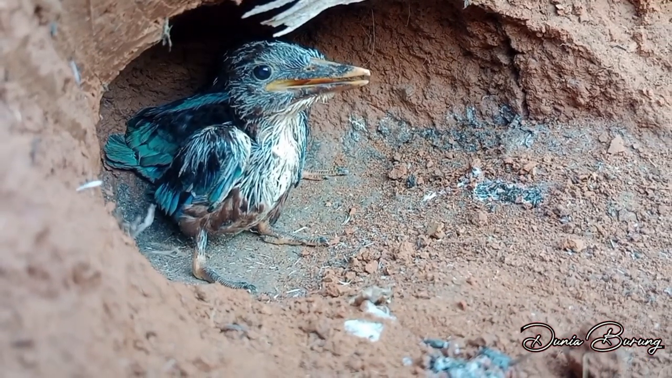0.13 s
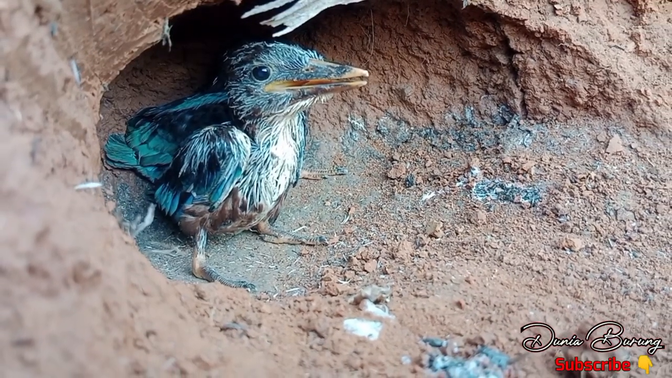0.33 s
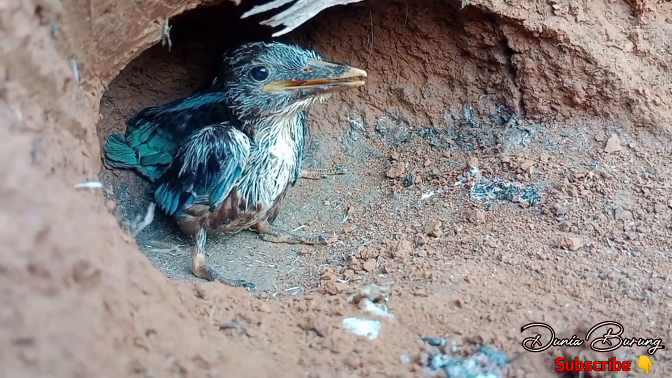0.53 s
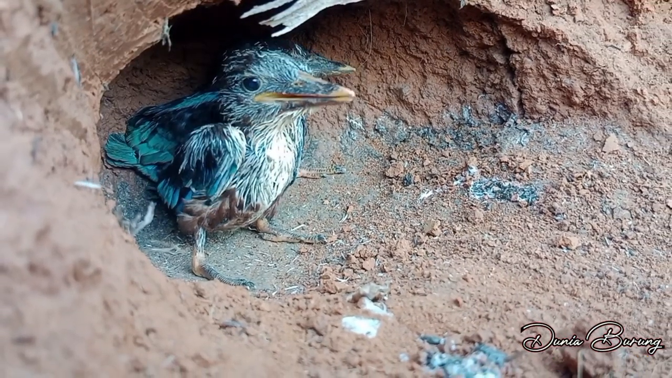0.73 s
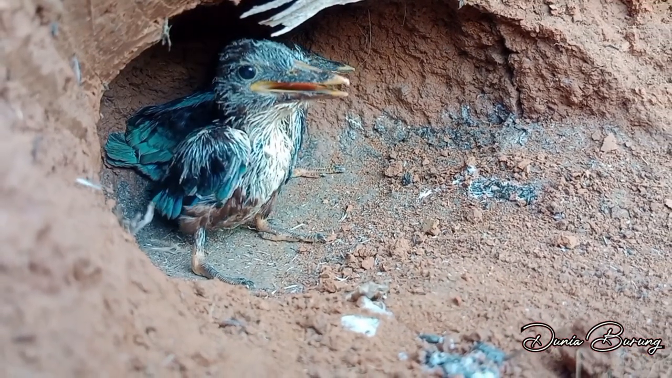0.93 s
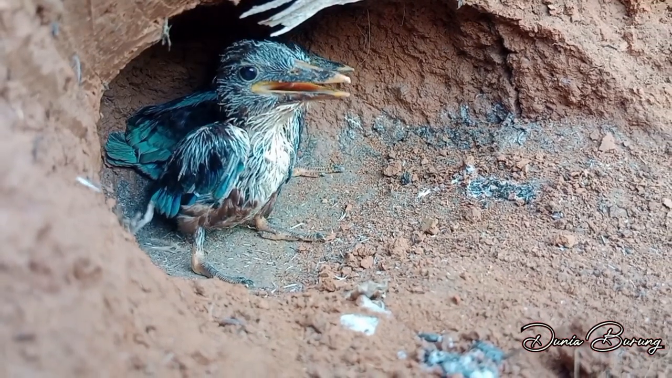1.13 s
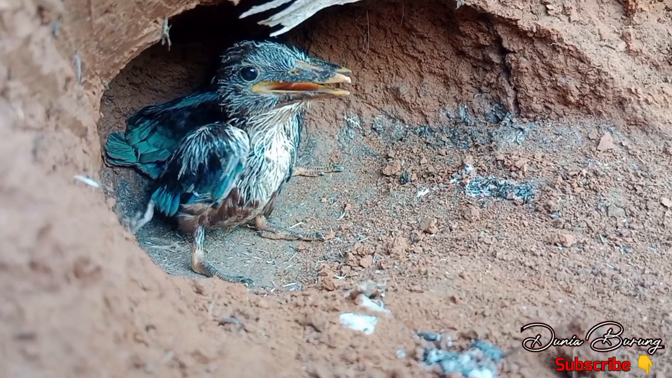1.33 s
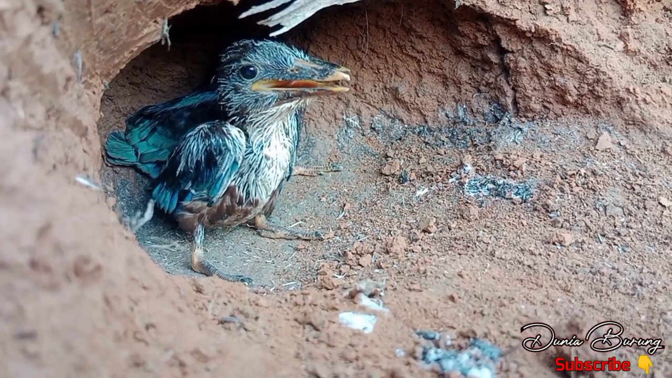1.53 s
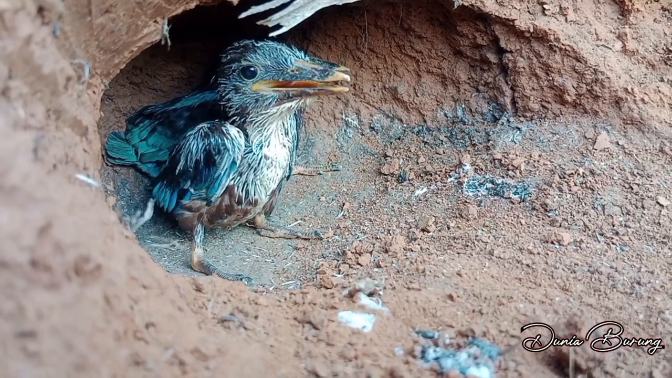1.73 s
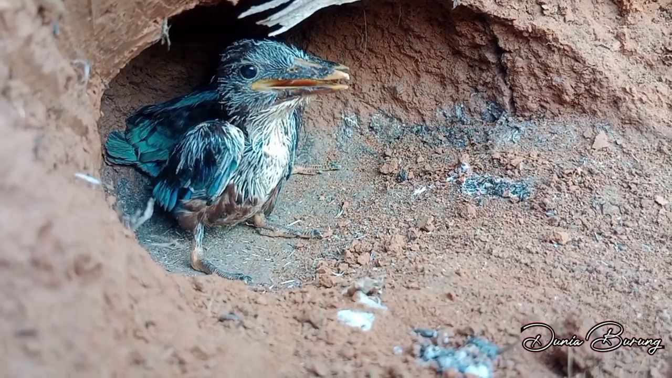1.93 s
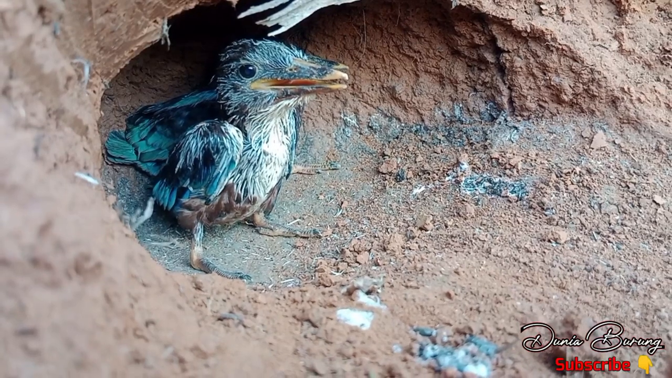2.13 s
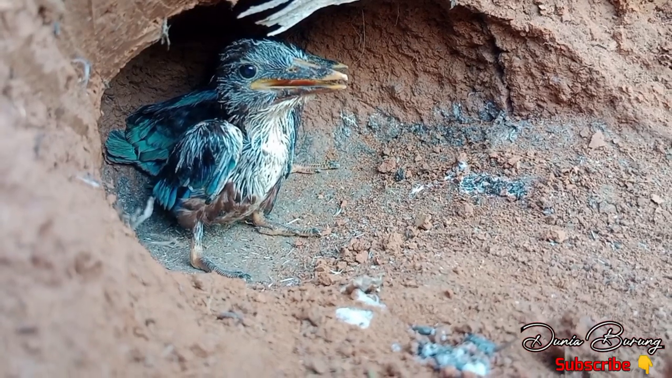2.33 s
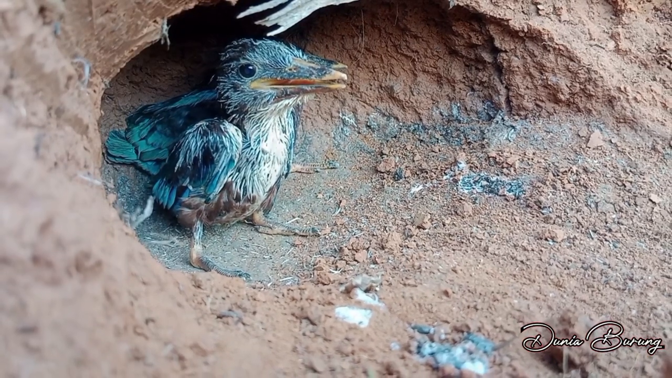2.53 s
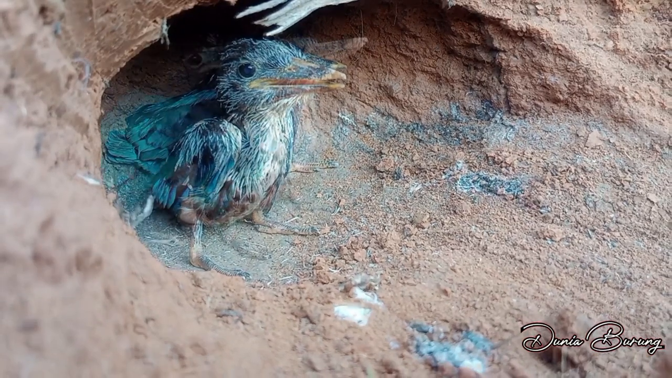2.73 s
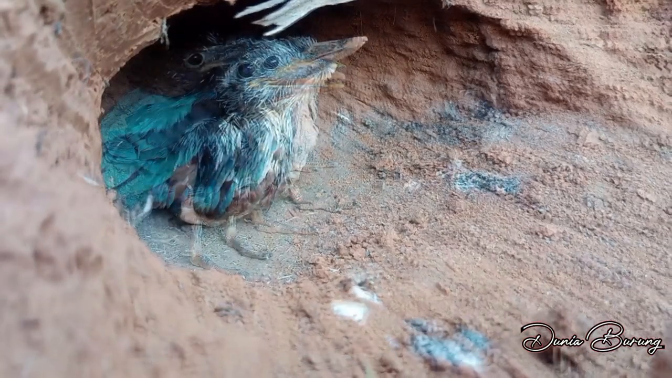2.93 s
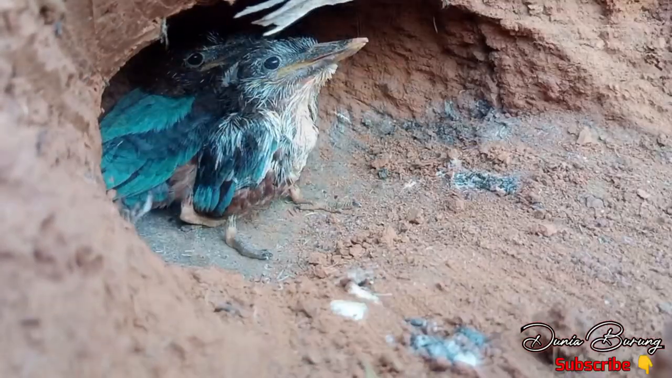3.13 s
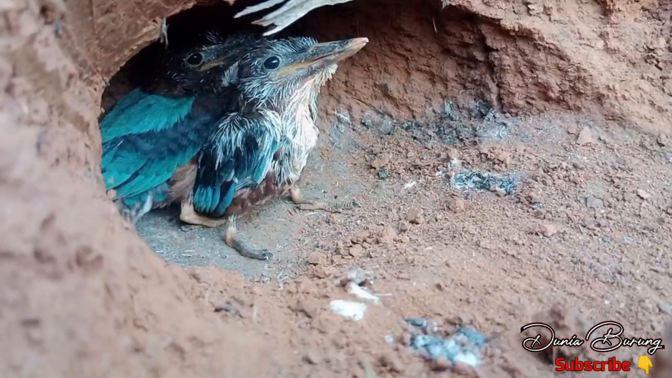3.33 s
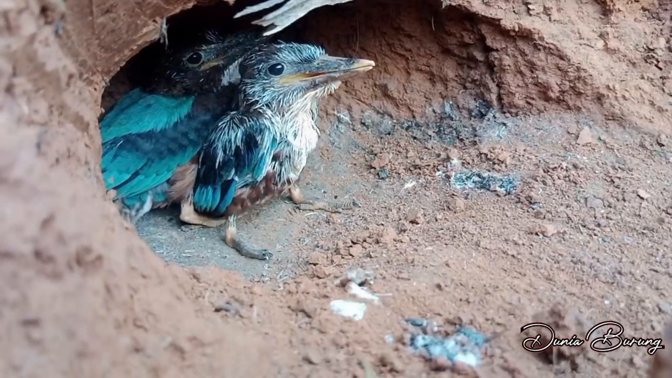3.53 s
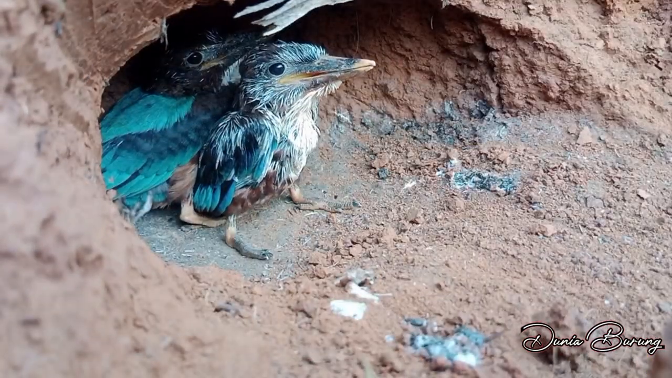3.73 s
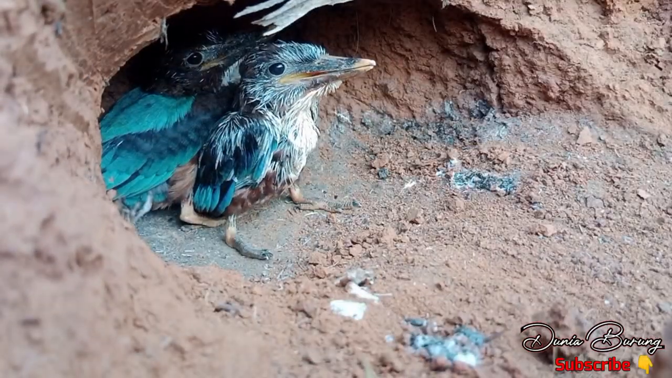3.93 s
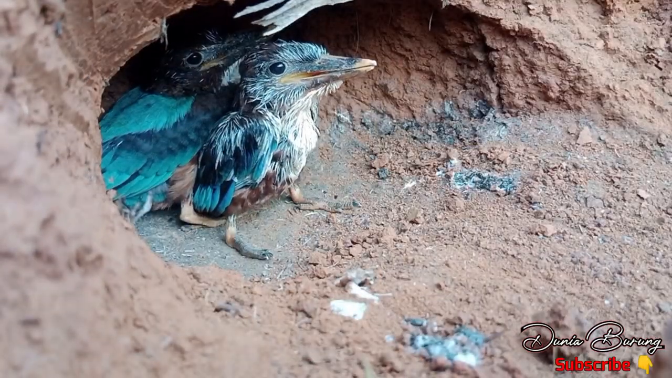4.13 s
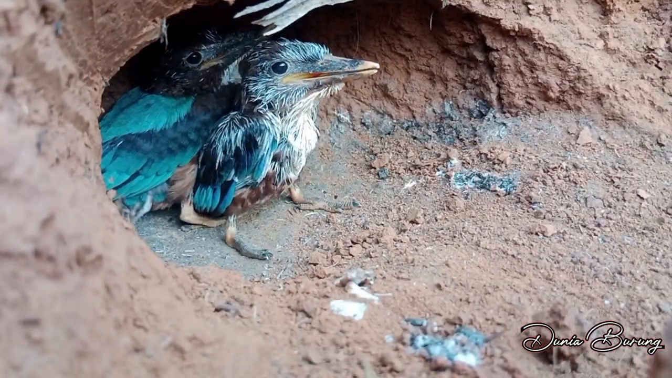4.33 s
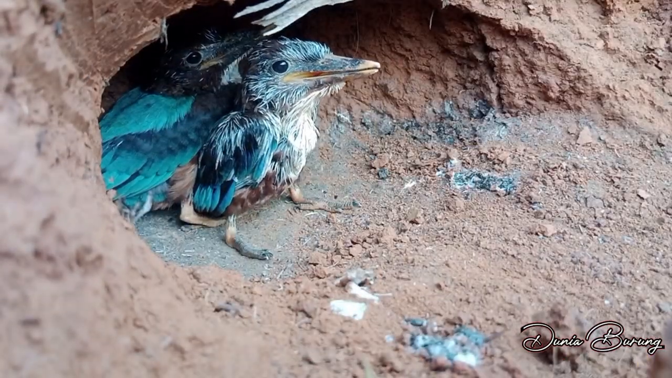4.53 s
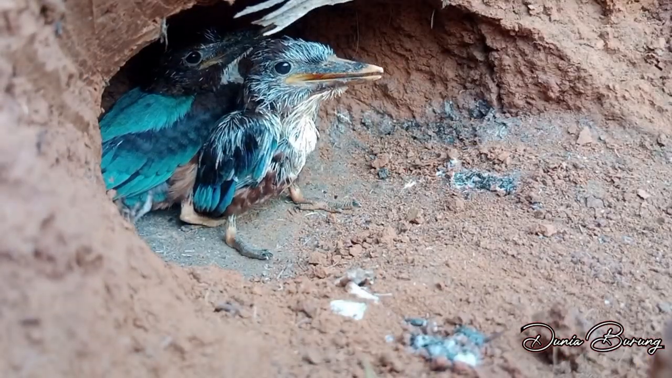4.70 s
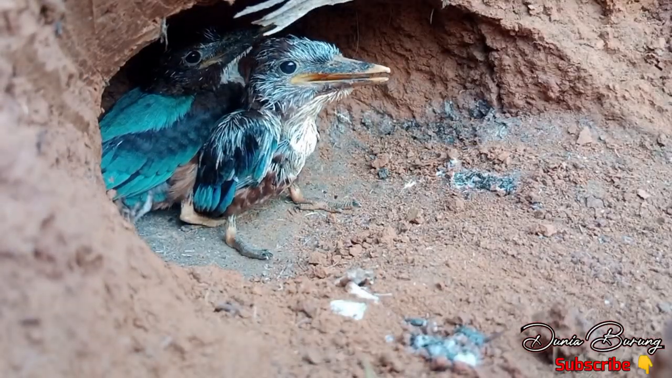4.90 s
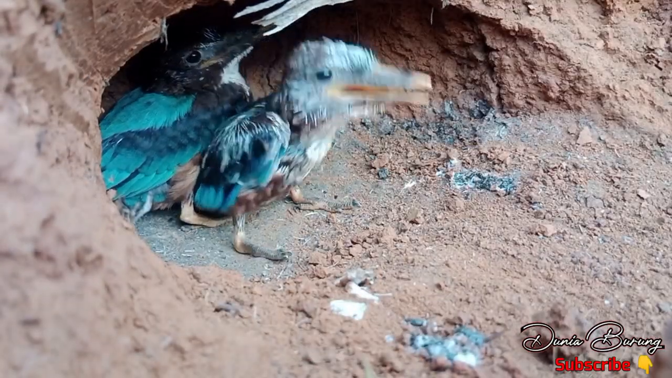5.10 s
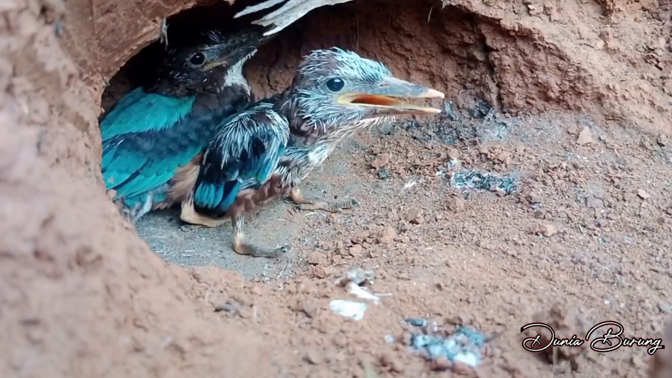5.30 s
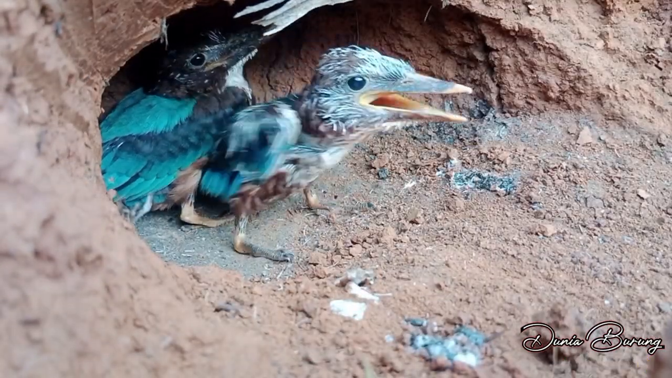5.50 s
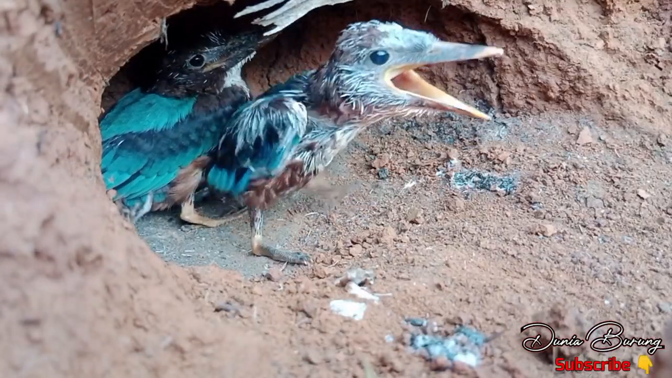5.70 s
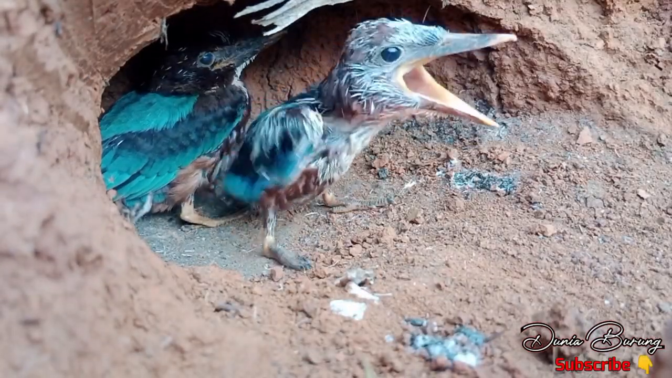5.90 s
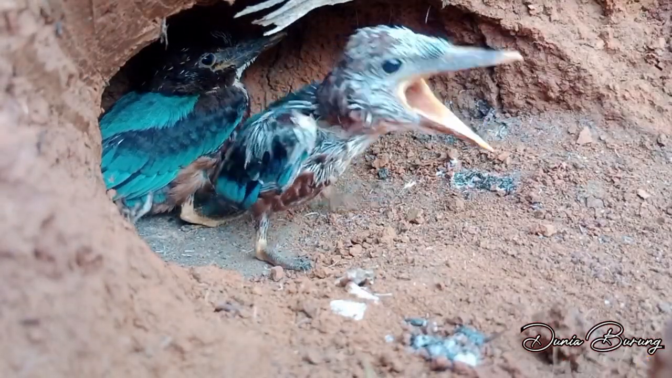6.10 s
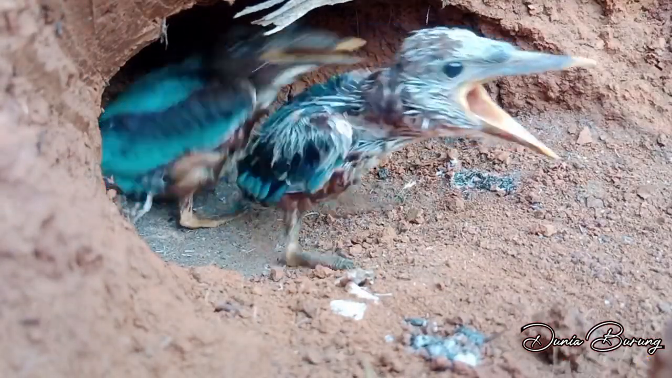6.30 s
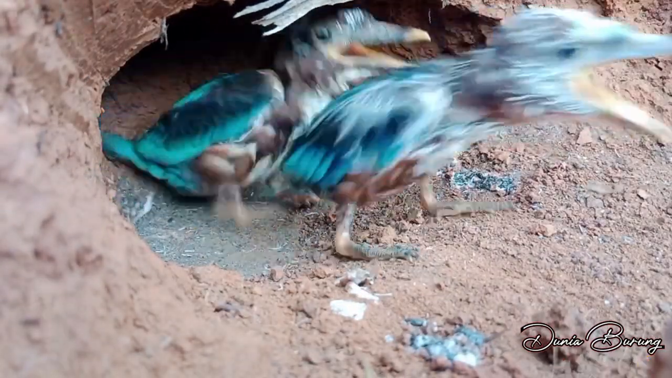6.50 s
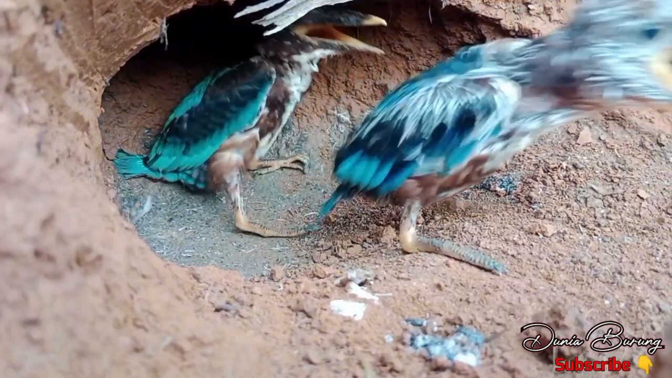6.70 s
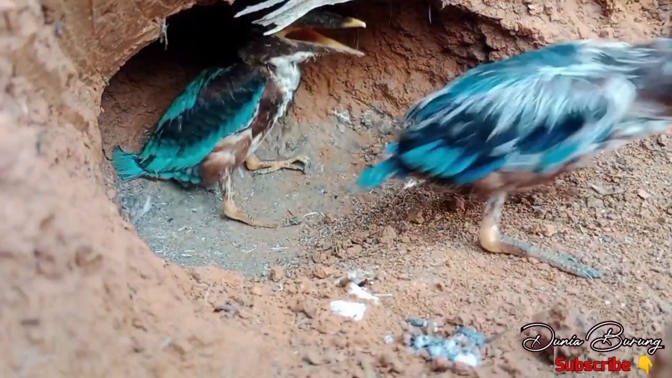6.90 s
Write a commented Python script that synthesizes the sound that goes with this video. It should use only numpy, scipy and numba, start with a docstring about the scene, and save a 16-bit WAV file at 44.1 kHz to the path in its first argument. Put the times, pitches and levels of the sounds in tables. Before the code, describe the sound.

A young bird begs at the mouth of an earth burrow, heard close and nearly dry against very quiet outdoor air. From 0.15 s, short rough buzzes of about 0.06 s repeat some ten times a second, each rising and falling in pitch, with small low croaks at the edges. Around 0.9-1.2 s they surge loudly with thin strained squeals, then settle into a steady quieter rattle, faintest near 3 s, with scattered tiny clicks and a barely audible low murmur early on. From 3.5 s the rasp gradually builds; by 4.9-5.6 s it is loud, bright and hissy, with a brief squeal. It eases slightly near 6 s, where two faint, soft, sinking bumps fall at 6.0 and 6.2 s. From 6.5 s to the cut at about 7 s, notes crowd to over twenty a second, joined by muffled rasps, perhaps a second chick, and squeals.

```python
"""Begging kingfisher nestlings

At the mouth of an earth burrow, close by, rasping notes come about ten a second, then crowd and brighten.
Each note is a rough buzz plus air noise; its pitch and throat resonance rise and fall with one push of air.
Low croaks and squeals go with the notes; muffled rasps, perhaps a second chick, join the last outburst.
Two soft sinking bumps sound as the first chick steps forward. Scattered thin clicks, made of brief noise,
and a faint low murmur of filtered noise are heard too, over quiet outdoor air.
"""
import sys
import numpy as np
from scipy import signal
from scipy.fft import rfft, irfft
from scipy.io import wavfile
from scipy.ndimage import uniform_filter1d
from numba import njit

SR = 44100
rng = np.random.default_rng(int(sys.argv[2]) if len(sys.argv) > 2 else 0)


def pcm_store(signal):
    """Save signal as 16-bit PCM."""
    levels = np.round(np.clip(np.atleast_2d(signal), -1, 1) * 32767)
    wavfile.write(sys.argv[1], SR, levels.astype(np.int16).T)


N = 306495
T = np.arange(N) / SR

# begging notes: (start [s], length [s], level [dB])
NOTES = [(0.151, 0.07, -35.5), (0.275, 0.059, -36.0), (0.394, 0.05, -35.5), (0.515, 0.053, -37.5),
         (0.648, 0.054, -33.5), (0.753, 0.074, -33.5), (0.841, 0.061, -30.5), (0.902, 0.062, -25.5),
         (0.958, 0.059, -22), (1.007, 0.082, -21.5), (1.132, 0.068, -32.0), (1.192, 0.064, -27),
         (1.303, 0.052, -32), (1.398, 0.062, -34.0), (1.495, 0.059, -32.5), (1.59, 0.059, -34),
         (1.693, 0.064, -33.4), (1.802, 0.06, -33.0), (1.915, 0.061, -35), (2.036, 0.044, -32.5),
         (2.148, 0.05, -35), (2.254, 0.059, -35.5), (2.377, 0.058, -35), (2.514, 0.048, -36),
         (2.617, 0.045, -35.5), (2.716, 0.061, -35.0), (2.812, 0.053, -37), (2.909, 0.063, -39),
         (3.006, 0.067, -40.5), (3.116, 0.045, -39.5), (3.188, 0.064, -43), (3.316, 0.066, -40.5),
         (3.428, 0.06, -37.5), (3.519, 0.061, -37), (3.632, 0.059, -36.5), (3.738, 0.056, -34.5),
         (3.847, 0.055, -37.5), (3.956, 0.043, -34), (4.058, 0.041, -32.5), (4.156, 0.051, -33),
         (4.244, 0.05, -33.5), (4.331, 0.046, -32.5), (4.431, 0.058, -34), (4.53, 0.046, -32),
         (4.623, 0.052, -31.0), (4.714, 0.058, -29.5), (4.808, 0.057, -30), (4.895, 0.061, -26),
         (4.962, 0.061, -25), (5.029, 0.067, -25), (5.131, 0.058, -27), (5.187, 0.078, -25),
         (5.277, 0.049, -24.5), (5.372, 0.057, -27.5), (5.458, 0.059, -22.5), (5.511, 0.07, -22),
         (5.572, 0.062, -23), (5.674, 0.06, -27.5), (5.75, 0.057, -25.5), (5.809, 0.062, -27.5),
         (5.907, 0.062, -29.5), (5.971, 0.057, -29), (6.023, 0.07, -26.5), (6.127, 0.064, -31.5),
         (6.196, 0.064, -28.5), (6.264, 0.06, -28.5), (6.351, 0.048, -29), (6.397, 0.033, -39.5),
         (6.431, 0.069, -26.5), (6.495, 0.038, -26), (6.53, 0.048, -21), (6.576, 0.044, -22.5),
         (6.617, 0.042, -21.5), (6.66, 0.043, -22.5), (6.7, 0.049, -21.5), (6.751, 0.049, -23),
         (6.796, 0.043, -22.5), (6.842, 0.052, -21.5), (6.898, 0.051, -22.5)]
# posture of the chick, 0 beak shut, 1 head raised, 2 wide gape, 3 neck thrust out: (time [s], posture [0-3])
POSTURE = [(0, 0), (2.6, 0), (3.1, 1.49), (3.5, 1), (4.85, 1), (5.05, 1.16), (5.6, 1.45), (5.69, 1.9),
           (6.1, 2), (6.3, 2.5), (6.52, 3), (6.95, 3)]
# how far a note falls off toward its edges: one value [dB] for each posture, 0 to 3
EDGE_FALL = [12.6, 13.9, 17.1, 10.15]
# colour of the voice in each posture: (frequency [Hz], level [dB])
VOICE_SHUT = [(290, -34.5), (450, -11), (690, -6.5), (880, -32.5), (1080, -33.5), (1550, 5), (2150, -1.5),
              (2350, -13), (2600, 3.5), (3250, -2.5), (3560, -10), (3850, -8.5), (4200, -22.5),
              (4550, -59.5)]
VOICE_RAISED = [(280, -47), (450, -7.5), (850, -8), (1170, -20.5), (1600, -2.5), (2220, -4.5),
                (2380, -13.5), (2530, -3), (2900, -8.5), (3150, -6), (3400, -15.5), (3800, -18.5),
                (4200, -30), (4500, -56)]
VOICE_GAPE = [(290, -52.5), (430, -5), (650, -3.5), (1150, -5.5), (1600, 6), (2150, -1.5), (2350, -8),
              (2550, 4), (2950, -13), (3300, 0.5), (3650, -2), (3900, 3.5), (4300, -11.5), (4750, -31.5)]
VOICE_THRUST = [(280, -54), (450, -15), (700, -6), (1100, -14), (1550, -5), (1900, 2), (2200, -5.5),
                (2500, -0.5), (2850, -11.5), (3150, 4), (3500, -10.5), (3900, -13), (4300, -28.5),
                (4800, -32)]
# upper resonances of the open and of the nearly shut beak: (frequency [Hz], level [dB])
HISS_OPEN = [(5000, -23.5), (5550, -13), (6000, -14.5), (6550, 2.5), (7100, -2), (7800, -15), (8500, -18),
             (9300, -29.5), (10500, -65.5)]
HISS_SHUT = [(4900, -38), (5600, -12), (6100, -14.5), (6500, 1), (7200, 1.5), (7900, -11), (8400, -34.5),
             (9200, -50)]
# hiss against the voice, before a fixed lift inside hiss(): (time [s], level [dB])
HISS_LEVEL = [(.2, -44.5), (.68, -54), (.8, -27), (1.2, -25.5), (1.7, -37), (1.9, -48.5), (2.45, -61.5),
              (2.9, -41), (3.3, -42.5), (3.5, -30.5), (4.65, -31.5), (5.05, -22.5), (5.45, -18),
              (5.75, -13), (6.2, -17), (6.45, -22.5), (6.6, -12.5), (6.95, -21)]
# colour of the thin whisper of air past the bill tip: (frequency [Hz], level [dB])
WHISPER = [(8900, -13), (9700, -1), (10300, -4), (11300, -14), (12400, -19), (13300, -18.5), (15000, -26)]
# whisper against the note, at the height of a note: (time [s], level [dB])
WHISPER_LEVEL = [(0, -71.5), (1.7, -65), (2.2, -52.5), (2.85, -48.5), (3.5, -53), (4.1, -42), (5.2, -44.5),
                 (5.5, -51), (6.3, -38), (6.95, -36.5)]
# a faint low murmur around 135 Hz, level at the top of each swell: (time [s], level [dB])
MURMUR = [(0, -63), (1, -64), (2.8, -65.5), (3.4, -82.5), (6.95, -84.5)]
# a few croaks that break out loudly: (middle [s], level [dB])
LOUD_CROAKS = [(0.211, -36.5), (1.971, -43), (2.433, -49.5)]
# thin clicks, level before noise and dulling: (time [s], level [dB])
CLICKS = [(0.217, -39), (.436, -37), (.698, -42), (1.26, -34), (1.857, -31.5), (2.077, -33), (4.095, -43),
          (4.573, -35), (4.674, -40), (5.093, -36), (6.31, -38), (6.459, -37)]
# strained squeals: (middle [s], length [s], top pitch [Hz], level [dB])
SQUEALS = [(.983, 0.02, 2600, -29), (.985, 0.038, 3090, -39), (1.034, 0.051, 3120, -28),
           (1.046, 0.054, 2570, -23.5), (1.211, 0.033, 2515, -23), (5.544, 0.029, 2538, -34),
           (6.722, 0.051, 2500, -23), (6.93, 0.061, 2460, -28)]
# muffled extra rasps, perhaps a second chick deeper in: (middle [s], length [s], level [dB])
SIBLING = [(3.083, 0.055, -44), (3.262, 0.054, -43.5), (3.386, .04, -46.5), (3.83, .084, -61),
           (5.657, .03, -65), (6.61, 0.24, -30.5), (6.836, .32, -35)]
# bumps on the soil: (middle [s], length [s], pitch at the middle [Hz], level of the tone [dB])
BUMPS = [(6.035, 0.17, 70.5, -49.5), (6.161, 0.0817, 127, -41.5)]
# colour of the quiet outdoor air: (frequency [Hz], level [dB])
AIR = [(25, -13.5), (60, -9), (120, -7), (400, -10.5), (1500, -24.5), (6000, -33.5), (15000, -35.5)]

AIR_DB = -86
TOP_HZ = 15600  # nothing much is heard above this
# effort is the amplitude of a note against a full-strength one at this level
FULL_DB = -21
# throat resonance at no effort and its rise at full effort, both before the crest factor in phrasing()
THROAT_REST_HZ, THROAT_EFFORT_HZ = 1981, 496
THROAT_SCATTER = 0.025  # random spread from note to note, as a share
# place of the crest within a note at no effort, and how much earlier it comes at full effort
CREST_SHARE, CREST_EARLIER = 0.58, 0.166
# share of the edge fall that is lost at full effort, so strained notes run together
MERGE_SHARE = 0.66
# the voice catches twice: after the opening pip and at a later, scattered share of the note
PIP_S, LATE_SHARE, LATE_SCATTER = 0.015, 0.758, 0.21
CATCH_S, CATCH_DB = 0.0047, 7.5  # depth at no effort with the beak shut
# croak level is against its note with the beak shut; the inset is its distance from the note's edge
CROAK_HZ, CROAK_S, CROAK_INSET_S, CROAK_DB, CROAK_SCATTER_DB = 710, 0.014, 0.0074, -23, 5


def undb(db):
    """Turn decibels into a gain."""
    return np.exp(np.asarray(db) * (np.log(10) / 20))


def curve(rows):
    """Join rows of (time, value) by straight lines, one value per sample."""
    return np.interp(T, *np.transpose(rows))


def steady(x, span_s):
    """Bring the running strength (rms) to 1 and keep the faster grain."""
    power = uniform_filter1d(x * x, max(int(span_s * SR), 8))
    return x / np.sqrt(np.abs(power) + 1e-12)


def wobble(span_s):
    """Smooth random wandering with a spread of about 1."""
    size = max(int(span_s * SR), 2)
    smooth = uniform_filter1d(uniform_filter1d(rng.standard_normal(N), size), size)
    return steady(smooth, 0.92)


def swell(centre, length):
    """A smooth rise and fall around a moment."""
    return np.cos(np.pi * np.clip((T - centre) / length, -0.5, 0.5)) ** 2


def colour(x, points, size=1024):
    """Filter a sound to the given loudness at each frequency, without sound ahead of its cause."""
    hz, db = np.transpose(points)
    grid = np.arange(size // 2 + 1) * SR / size + 1
    # outside the points the response falls 40 dB an octave, down to 60 dB
    outside = np.abs(np.log2(grid / np.clip(grid, hz[0], hz[-1])))
    level_db = np.interp(np.log(grid), np.log(hz), db) - 20 * np.minimum(2 * outside, 3)
    # folding the cepstrum packs the response as early as possible (minimum phase)
    cepstrum = irfft(np.log(undb(level_db)))
    cepstrum[1:size // 2] *= 2
    cepstrum[size // 2 + 1:] = 0
    response = irfft(np.exp(rfft(cepstrum)))
    return signal.fftconvolve(x, response)[:N]


@njit
def resonance(x, hz, width):
    """A hollow that rings around a moving frequency: a state-variable band-pass filter."""
    y, band, low = np.empty(len(x)), 0., 0.
    for i in range(len(x)):
        g, k = np.tan(np.pi * hz[i] / SR), width / hz[i]
        v = (band + g * (x[i] - low)) / (1 + g * (g + k))
        band, low, y[i] = 2 * v - band, low + 2 * g * v, k * v
    return y


def low_noise(centre_hz, width_hz):
    """Random noise passed twice through one fixed resonance."""
    centre = np.full(N, float(centre_hz))
    once = resonance(rng.standard_normal(N), centre, width_hz)
    return resonance(once, centre, width_hz)


def still_air():
    """Quiet outdoor air: steady noise that is strongest at the bottom."""
    return undb(AIR_DB) * steady(colour(rng.standard_normal(N), AIR), 0.5)


def phrasing(edge_s=0.0041, arch=0.22, crest=1.02, falter_db=3.0, falter_s=0.0025):
    """Give air pressure (0-1), loudness and throat resonance; every note is one arch of pressure."""
    pressure, gain, throat = np.zeros(N), np.zeros(N), []
    chances = rng.standard_normal((len(NOTES), 2))
    for (start, length, db), (chance, detune) in zip(NOTES, chances):
        now = slice(int(start * SR), int((start + length) * SR))
        age = T[now] - start
        effort = undb(db - FULL_DB)
        posture = np.interp(start, *np.transpose(POSTURE))

        top = length * (CREST_SHARE - CREST_EARLIER * effort)
        pressure[now] = np.sin(np.pi / 2 * np.interp(age, [0, top, length], [0, 1, 0]))

        edge_db = np.interp(posture, np.arange(len(EDGE_FALL)), EDGE_FALL)
        edge_db = edge_db * (1 - MERGE_SHARE * effort ** 2)
        catches = PIP_S, length * (LATE_SHARE + LATE_SCATTER * chance)
        dip = sum(np.exp(-(2 * (age - s) / CATCH_S) ** 2) for s in catches)
        # a raised head and a hard push both smooth the catches over
        dip = dip * (1 - effort) / (1 + posture)
        shape = undb(-edge_db * (1 - pressure[now]) - CATCH_DB * dip)
        gain[now] = undb(db) * shape / np.sqrt(np.mean(shape ** 2))

        throat_hz = THROAT_REST_HZ + THROAT_EFFORT_HZ * effort
        throat.append((start + top, throat_hz * (1 + THROAT_SCATTER * detune)))
    # the resonance climbs with the pressure and drops as the note dies
    hz = curve(throat) * (crest - arch * (1 - pressure) ** 2)
    # the voice falters most where the pressure is low
    gain = gain * undb(falter_db * (1.0263 - pressure) * wobble(falter_s))
    size = int(edge_s * SR)
    gain = uniform_filter1d(uniform_filter1d(gain, size), size // 2)
    return pressure, gain, hz


def syrinx(pressure, hz, calm=0.0245, chaos=0.14, chaos_s=0.0008, slap_db=3.0, slap_s=0.0013,
           calm_air=1.0, turbulence=0.56, strain=0.15, smoothing=0.46, count=13):
    """The voice membranes buzz an octave below the throat resonance, more unsteadily under pressure."""
    posture = curve(POSTURE)
    drive = np.clip(pressure + strain * posture, 0, 1)
    pitch = hz / 2 * (1 + (calm + chaos * drive) * wobble(chaos_s))
    phase = 2 * np.pi * np.cumsum(pitch) / SR
    buzz = sum(np.cos(k * phase) for k in range(1, count + 1)) / np.sqrt(count / 2)
    air = (calm_air + turbulence * drive) * rng.standard_normal(N)
    # uneven slaps chop buzz and air into a rasp; they even out as the chick stretches
    slaps = undb(slap_db / (1 + smoothing * posture) * wobble(slap_s))
    return (buzz + air) * slaps


def rasp(source, hz, ring_db=7, width_hz=300.0, upper=2.0, upper_db=-1, upper_width_hz=38.0,
         wander=0.097, wander_s=0.018, even_s=0.017):
    """The buzz rings the throat and a restless resonance about an octave above; posture colours it."""
    throat = source + undb(ring_db) * resonance(source, hz, width_hz)
    upper_hz = hz * upper * (1 + wander * wobble(wander_s))
    throat = throat + undb(upper_db) * resonance(source, upper_hz, upper_width_hz)
    posture = curve(POSTURE)
    mix = np.zeros(N)
    # blend the two colours nearest to the present posture
    for k, shape in enumerate((VOICE_SHUT, VOICE_RAISED, VOICE_GAPE, VOICE_THRUST)):
        share = np.maximum(1 - np.abs(posture - k), 0)
        mix += share * steady(colour(throat, shape), 0.071)
    return steady(mix, even_s)


def hiss(source, pressure, edge_db=8, lift_db=2):
    """Upper beak resonances and a whisper at the bill tip speak most at the height of a note."""
    opened = np.clip(curve(POSTURE), 0, 1)
    beak = (1 - opened) * colour(source, HISS_SHUT) + opened * colour(source, HISS_OPEN)
    beak = steady(beak, 0.013) * undb(curve(HISS_LEVEL) + lift_db)
    tip = steady(colour(source, WHISPER), 0.027) * undb(curve(WHISPER_LEVEL))
    return (beak + tip) * undb(-edge_db * (1 - pressure ** 2))


def murmur(loudness):
    """A faint low murmur around 135 Hz, swelling and fading: noise through a low resonance."""
    return steady(low_noise(135, 90.0), 0.15) * loudness * undb(curve(MURMUR))


def croaks(waver=0.076, waver_s=0.0016, shimmer=0.075, loud_s=0.02):
    """Slack membranes give a low wavering tone as a note starts and dies, fading as the beak gapes."""
    scatter = rng.standard_normal((len(NOTES), 2))
    marks = np.zeros(N)
    for (start, length, db), chance in zip(NOTES, scatter):
        edges = np.array([start + CROAK_INSET_S, start + length - CROAK_INSET_S])
        spots = np.minimum((edges * SR).astype(int), N - 1)
        marks[spots] = undb(db + CROAK_DB + CROAK_SCATTER_DB * chance)
    # each mark becomes a short smooth swell
    loudness = signal.fftconvolve(marks, np.hanning(int(CROAK_S * SR)), "same")
    loudness = loudness * np.maximum(1 - curve(POSTURE) / 2, 0)
    loudness = loudness + sum(undb(db) * swell(s, loud_s) for s, db in LOUD_CROAKS)
    unrest = wobble(waver_s)
    phase = 2 * np.pi * np.cumsum(CROAK_HZ * (1 + waver * unrest)) / SR
    return loudness * (1 + shimmer * unrest) * np.sqrt(2) * np.sin(phase)


def clicks(decay_s=0.00049, dull=0.88):
    """Scattered thin clicks: noise that dies within a few thousandths of a second, its treble softened."""
    hits = np.zeros(N)
    for s, db in CLICKS:
        hits[int(s * SR)] = undb(db)
    fading = signal.lfilter([1], [1, -np.exp(-1 / (decay_s * SR))], hits)
    burst = fading * rng.standard_normal(N)
    return signal.lfilter([1 - dull], [1, -dull], burst)


def squeals(waver=0.0256, waver_s=0.002, bend=0.04, shimmer=0.13):
    """The membranes lock briefly into a wavering tone whose pitch arches up and back."""
    unrest, out = wobble(waver_s), np.zeros(N)
    for s, length, hz, db in SQUEALS:
        shape = swell(s, length)
        pitch = hz * (1 - bend * (1 - shape) + waver * unrest)
        tone = np.sqrt(2) * np.sin(2 * np.pi * np.cumsum(pitch) / SR)
        out += undb(db) * shape * tone
    return out * (1 + shimmer * unrest)


def sibling(rough_db=3, rough_s=0.0024):
    """Muffled rasps: uneven noise coloured by a shut beak."""
    rough = colour(rng.standard_normal(N), VOICE_SHUT) * undb(rough_db * wobble(rough_s))
    return steady(rough, 0.03) * sum(undb(db) * swell(s, length) for s, length, db in SIBLING)


def bumps(sag=1.5, crumble=0.45):
    """Soft soil gives a few cycles of a sinking thud, with a crumbly rumble around 110 Hz."""
    rumble = steady(low_noise(110, 68.0), 0.11)
    out = np.zeros(N)
    for s, length, hz, db in BUMPS:
        age = T - s
        thud = np.sin(2 * np.pi * hz * age * (1 - sag * age))
        out += undb(db) * swell(s, length) * (thud + crumble * rumble)
    return out


def burrow(x, wet_db=-24, t60=0.045):
    """Earth walls return a weak tail of noise that falls 60 dB in t60 seconds."""
    age = T[:SR // 10]
    tail = rng.standard_normal(len(age)) * undb(-60 * age / t60)
    tail = tail / np.linalg.norm(tail)
    return x + undb(wet_db) * signal.fftconvolve(x, tail)[:N]


def scene():
    """Put calls and clicks in the burrow mouth, then add murmur, bumps and still air."""
    pressure, gain, hz = phrasing()
    source = syrinx(pressure, hz)
    call = gain * (rasp(source, hz) + hiss(source, pressure))
    inside = burrow(call + croaks() + clicks() + squeals() + sibling())
    return (still_air() + inside + murmur(pressure) + bumps())[None]


def record(dry, ceiling=0.56):
    """The recorder rounds the loudest peaks and cuts the extreme treble."""
    rounded = dry - dry ** 5 / (5 * ceiling ** 4)
    return signal.sosfilt(signal.ellip(8, 0.2, 70, TOP_HZ, fs=SR, output="sos"), rounded)


dry = scene()
out = record(dry)
pcm_store(out)
```